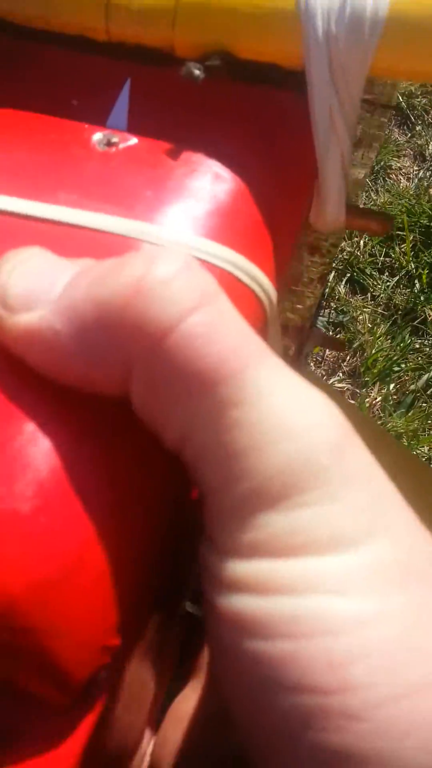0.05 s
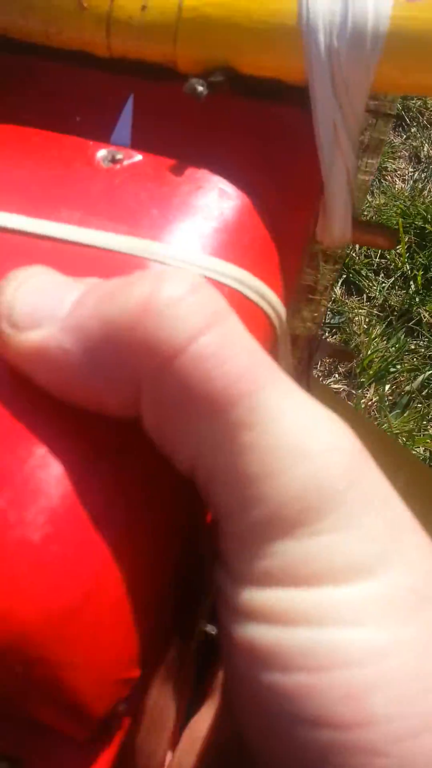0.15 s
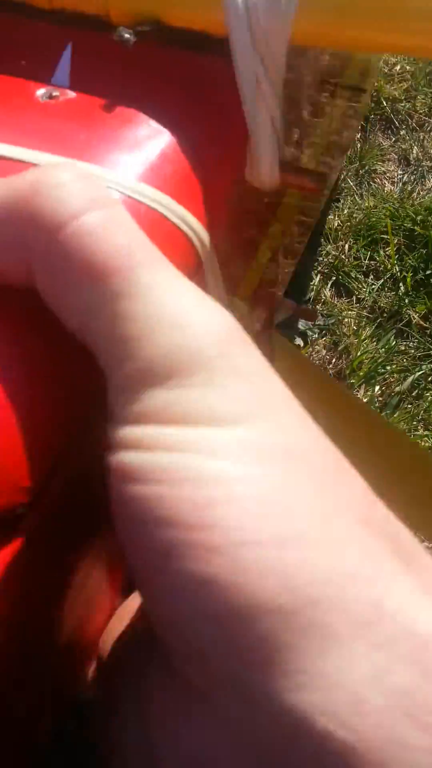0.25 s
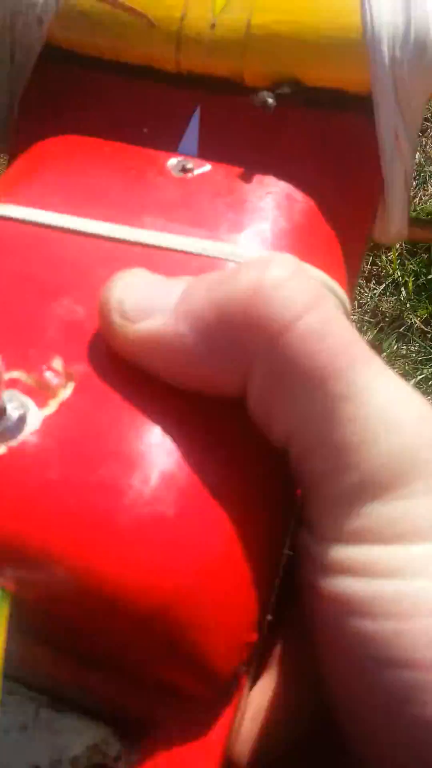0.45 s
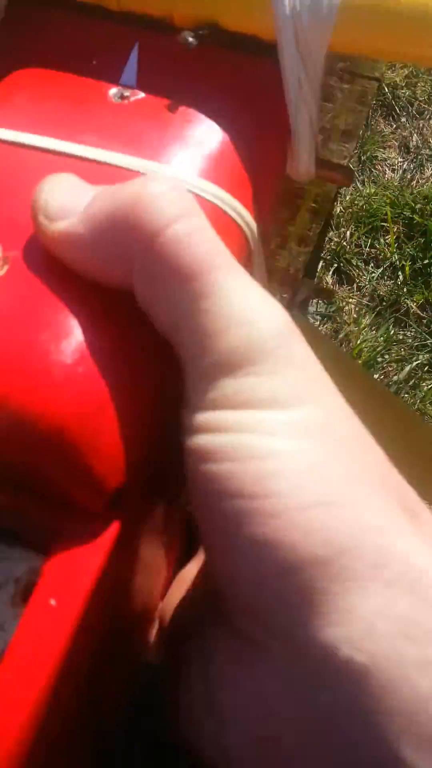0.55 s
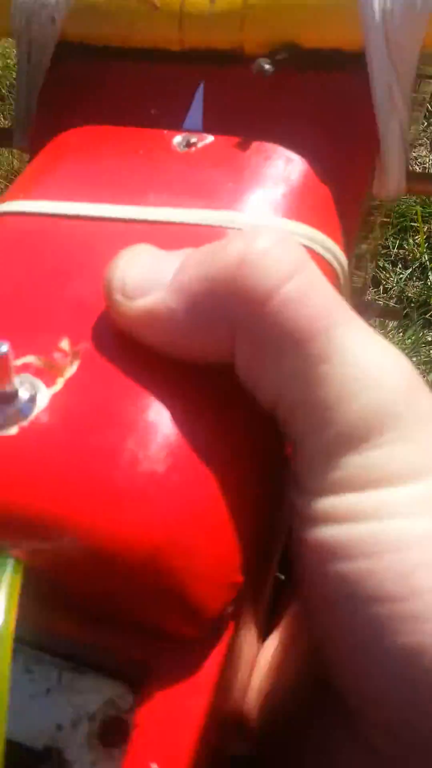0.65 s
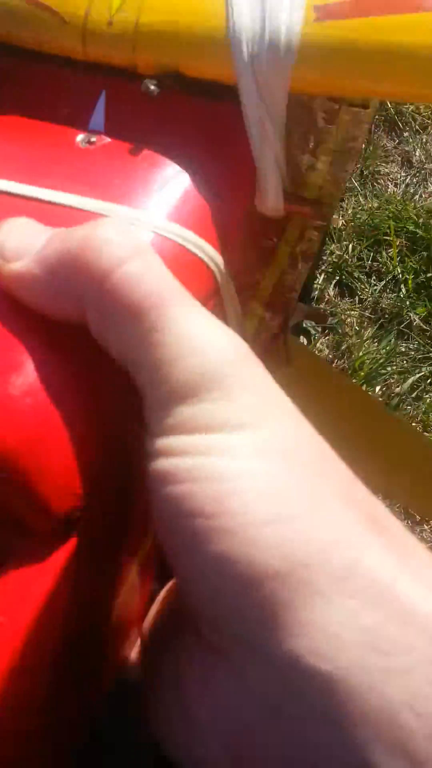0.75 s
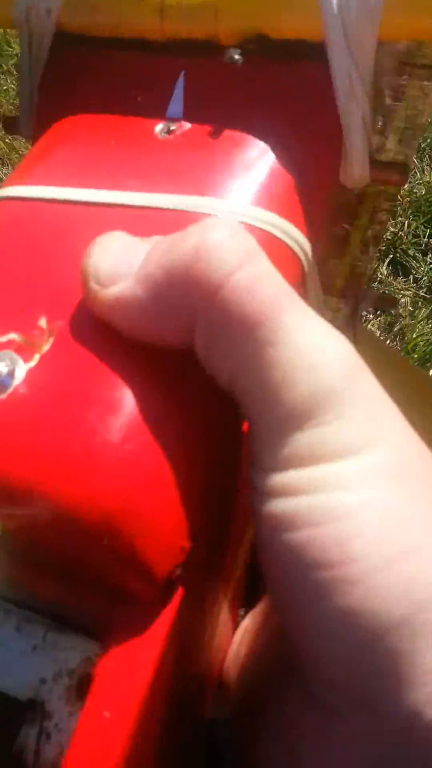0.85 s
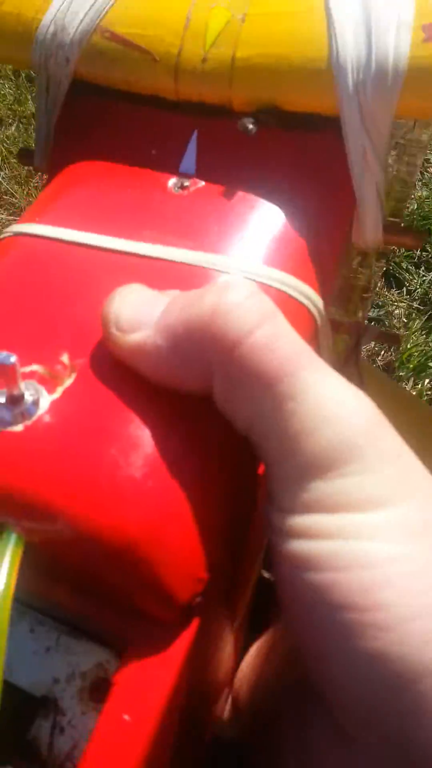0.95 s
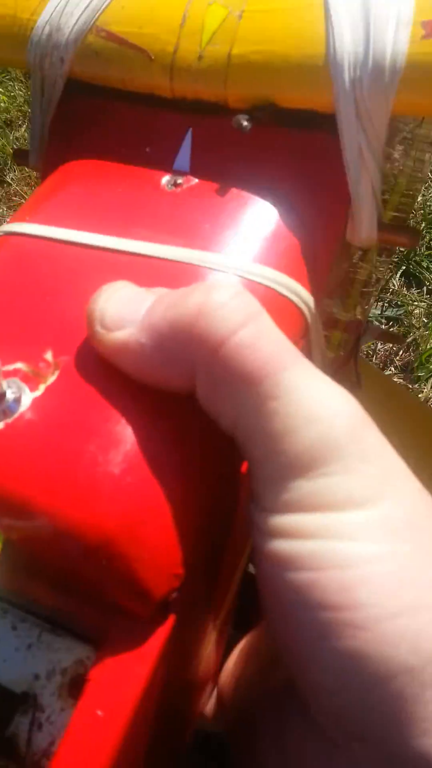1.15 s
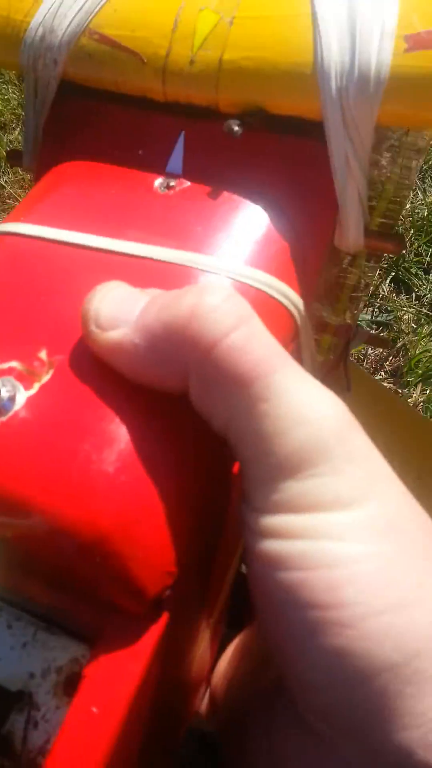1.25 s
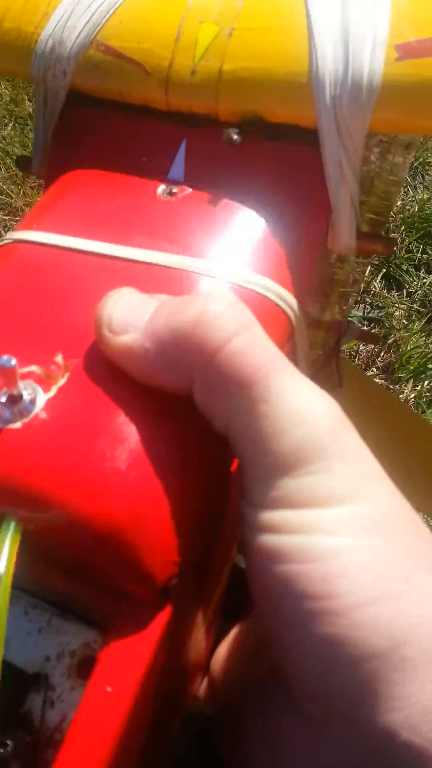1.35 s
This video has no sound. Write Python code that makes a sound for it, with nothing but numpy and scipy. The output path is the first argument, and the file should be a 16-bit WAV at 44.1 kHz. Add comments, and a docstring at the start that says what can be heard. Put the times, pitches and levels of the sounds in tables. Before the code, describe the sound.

Small plastic fuel tank shaken by hand, hollow knocks and scrapes with dull liquid thuds

```python
"""Shaken plastic fuel tank

A hand shakes a small plastic fuel tank in its seat in a plane, outdoors and close to the microphone.
Knocks and scrapes of shell on mount excite damped modes; skin rubs as grainy, coloured noise; the fuel
sloshes as low noise with dull thuds, short swelling tones. Air and hiss are coloured noise.
Nearly all of it reaches the left channel; the right one carries little but hiss."""
import sys
import numpy as np
from scipy import signal
from scipy.fft import rfft, irfft, next_fast_len
from scipy.io import wavfile
from scipy.ndimage import uniform_filter1d

SR = 44100
rng = np.random.default_rng(int(sys.argv[2]) if len(sys.argv) > 2 else 0)


def master_out(mix):
    """Clip the mix to full scale and print it as 16-bit PCM to the path in sys.argv[1]."""
    frames = np.transpose(np.atleast_2d(mix))
    ceiling = np.clip(frames, -1, 1)
    pcm = np.round(ceiling * 32767).astype(np.int16)
    wavfile.write(sys.argv[1], SR, pcm)


N = 61739  # samples

# Spectrum of the outdoor air. Each row: frequency in Hz, relative level in dB.
AIR_SPECTRUM = [(30, -6), (90, 24.5), (250, 0), (600, 6), (1200, -9), (2500, -36), (5000, -24),
                (14000, -19)]
# Rms level of the air in dB: left, right.
AIR_LEVELS_DB = [-61, -67]
# Hiss of changing level. Each row: time in seconds, level in dB.
HISS_LEVEL = [(0, -65.5), (.205, -63.5), (.225, -55), (.255, -55.5), (.29, -66), (.345, -55.5),
              (.41, -58.5), (.47, -54), (.62, -54.5), (.75, -52), (.93, -52.5), (1.0, -60.5), (1.07, -56),
              (1.11, -64), (1.315, -65.5), (1.345, -60.5), (1.4, -65.5)]
# Spectrum of the hiss. Each row: frequency in Hz, relative level in dB.
HISS_SPECTRUM = [(30, 2), (100, 8), (280, 17), (550, 8), (1000, 12), (2300, 7.5), (4000, 2.5), (6500, 0.5),
                 (11000, 0.5), (14500, -1)]
HISS_LEFT_DB = -0.5  # left channel against the right

# Low churning of the fuel. Each row: time in seconds, level in dB ahead of the bass cut.
SLOSH_LEVEL = [(0, -53.5), (.10, -53), (.12, -40), (.25, -45.5), (.29, -47.5), (.33, -37), (.40, -35.5),
               (.50, -39.5), (.60, -27.5), (.70, -35), (.84, -41.5), (.90, -44.5), (1.01, -50.5),
               (1.12, -41), (1.20, -43), (1.29, -52), (1.35, -46), (1.4, -53)]
# Spectrum of the churning. Each row: frequency in Hz, relative level in dB.
SLOSH_SPECTRUM = [(20, -33), (40, -25), (62, -0.5), (85, 3.5), (140, -4), (230, -6.5), (340, -10.5),
                  (700, -40.5), (1500, -33.5), (4000, -55)]
# Dull thuds of the fuel and of the tank in the hand, and, in the row at 0.518 s and 486 Hz, a low ring of the
# shell under the knock at 0.515 s. Each row: centre in seconds, pitch in Hz, peak of the fundamental in dB
# ahead of the bass cut, half length in seconds before scaling.
THUD_EVENTS = [(.133, 167, -33.5, 0.0063), (.149, 131, -28.5, 0.0065), (.219, 163, -29.5, 0.0063),
               (.241, 145, -26.5, 0.0016), (.318, 130, -28.5, 0.0025), (.351, 186, -25.5, 0.0044),
               (.393, 127, -19.5, 0.0038), (.403, 189, -22.5, 0.0026), (.421, 151, -26, 0.0022),
               (.437, 108, -35.5, .005), (.491, 162, -22.5, 0.0018), (.512, 140, -19.5, 0.0027),
               (0.518, 486, -17, 0.0023), (.557, 135, -24, 0.012), (.576, 295, -8, 0.0025),
               (0.586, 134, -21.5, 0.0038), (.626, 173, -18.5, .006), (.648, 96, -29.5, 0.009),
               (.678, 182, -29.5, 0.0088), (.713, 198, -21.5, 0.0035), (.788, 114, -31.5, 0.005),
               (.814, 214, -31, 0.0085), (.834, 228, -30.5, 0.0093), (.861, 146, -29.5, 0.0069),
               (.925, 240, -34.5, 0.0059), (1.109, 153, -34, 0.003), (1.127, 122, -34.5, 0.0068),
               (1.214, 179, -28.5, 0.0038), (1.262, 162, -35.5, 0.0029)]
THUD_ATTACK, THUD_RELEASE = .8, 1.1  # Gaussian widths, in half lengths
THUD_BULGE = 1.3  # the wall gives unevenly, so strong thuds gain an overtone
BASS_CUT_HZ = 32

# Rubbing of hand and shell. Each row: time in seconds, level in dB.
RUB_LEVEL = [(0, -67.5), (.20, -73), (.225, -44.5), (.255, -51.5), (.29, -66), (.34, -51.5), (.39, -49),
             (.42, -53), (.455, -41), (.54, -43), (.595, -41), (.66, -43.5), (.77, -42), (.93, -42),
             (.97, -58.5), (1.06, -46), (1.11, -65), (1.4, -75)]
# Spectrum of the rubbing. Each row: frequency in Hz, relative level in dB.
RUB_SPECTRUM = [(150, 7.5), (400, 8.5), (730, 7.5), (1050, -4), (1800, 2), (3000, -2.5), (4400, -1.5),
                (5900, 0), (7200, -9), (10000, -16), (14500, -25)]
RUB_GRAINS_PER_S, RUB_SMOOTH = 900, .6  # rate of slips; steady noise against grains of rms 1
RUB_PATCHY_DB, RUB_PATCH_S = 1, 0.01  # rms unevenness and its averaging time
RUB_RING_DB = -14.5  # ringing shell against the direct rub
# Dull creep of the grip. Each row: time in seconds, level in dB.
GRIP_LEVEL = [(0, -65), (.15, -61.5), (.29, -54.5), (.40, -66), (.62, -49.5), (.90, -62), (1.05, -50.5),
              (1.17, -50.5), (1.28, -58.5), (1.4, -72)]
# Spectrum of the creep. Each row: frequency in Hz, relative level in dB.
GRIP_SPECTRUM = [(150, 8), (350, -6.5), (650, 4), (1000, -5), (1700, -9.5), (3000, -21.5), (8000, -54)]

# Modes of the shell. Each row: frequency in Hz, decay by 60 dB in seconds, relative level in dB.
SHELL_MODES = [(513.5, 0.029, -5.5), (633, 0.027, -0.5), (744, 0.06, -0.5), (860, 0.0083, -10),
               (1194, 0.031, 21), (1320, 0.034, 1), (1733, 0.018, 20), (1836, 0.039, 6.5),
               (2570, 0.008, 6.5), (3300, 0.019, 7), (4257, 0.031, 2.5), (4834, 0.057, -2),
               (5130, 0.0061, 3.5), (5390, 0.047, -1)]
# Groups of modes from low to high. Each row: lowest frequency in Hz, highest frequency in Hz.
MODE_GROUPS_HZ = [(420, 880), (1020, 1400), (1580, 1980), (2300, 3800), (4000, 6200)]
# Contacts of shell and mount. Each row: start in seconds, rise in seconds, tuning of the modes as a
# factor, level of each of the five mode groups from low to high in dB, share sent to the right
# channel in dB ahead of its colouring.
CONTACTS = [(0.2325, 0.0014, 0.98, -40, -49, -39, -47, -49, -24),
            (0.3362, 0.0018, 1, -41, -53, -49, -60, -61, -24),
            (0.374, 0.0013, 1.04, -39, -48, -45, -44, -47, -24),
            (0.468, 0.0014, 1, -37, -41, -34, -33, -34, -20),
            (0.4775, 0.0015, 1, -31, -41, -38, -45, -45, -15),
            (0.5152, 0.0006, 1.02, -28, -37, -23, -37, -33, -23),
            (0.573, 0.0012, 0.95, -34, -48, -52, -49, -48, -24),
            (0.5895, 0.002, 1, -42, -54, -45, -49, -43, -24),
            (0.6245, 0.002, 1, -45, -63, -49, -49, -49, -24),
            (0.6375, 0.0012, 1, -41, -55, -46, -54, -62, -24),
            (0.665, 0.0006, 1, -47, -51, -46, -53, -50, -24),
            (0.6898, 0.0016, 1, -35, -39, -28, -30, -31, -22),
            (0.7325, 0.0012, 1, -38, -47, -49, -54, -48, -13),
            (0.7498, 0.0006, 0.99, -27, -28, -29, -36, -36, -17),
            (0.7845, 0.0006, 1, -40, -48, -50, -51, -50, -24),
            (0.8035, 0.0022, 1.03, -46, -55, -46, -49, -51, -24),
            (0.8312, 0.0013, 1.02, -36, -48, -42, -40, -37, -24),
            (0.872, 0.0007, 0.97, -40, -40, -36, -44, -45, -15),
            (0.905, 0.0012, 1, -36, -47, -44, -41, -45, -24),
            (0.912, 0.0014, 1, -35, -47, -39, -40, -41, -18),
            (0.9295, 0.0016, 1, -35, -47, -45, -48, -46, -24),
            (0.9795, 0.001, 1, -45, -64, -67, -69, -70, -24),
            (1.3255, 0.0004, 1, -62, -57, -63, -75, -66, -24)]
KNOCK_SPAN_S = .02  # knock levels are rms over this time
CHATTER_PER_S, FIRST_TOUCH = 6000, 1.3  # rate of tiny slips; force of the touch against a slip's peak
CRACK_DB, CRACK_T60_S = -8, .022  # dense, quickly damped modes under the distinct ones
TICK_DB, TICK_RISE_S = -13, 0.0004  # level against the top modes, for a contact of this rise
TICK_T60_S, TICK_CUT_HZ = 0.0078, 4100
# Filter of the knocks' trace on the right. Each row: frequency in Hz, gain in dB.
RIGHT_FILTER = [(60, -3), (400, -14), (800, -10), (1150, -23), (1500, -6), (1850, -5.5), (2300, -6),
                (5000, -51), (12000, -25)]

CUTOFF_HZ = 14550  # the recorder's upper limit


def amp(db):
    """Logarithmic level: decibels to amplitude gain."""
    return 10 ** (np.asarray(db) / 20)


def unit(x):
    """Normalisation of power: scales to rms 1."""
    return x / np.sqrt(np.mean(x ** 2) + 1e-20)


def level(points):
    """Envelope: decibels interpolated between (s, dB) points, as gain over time."""
    return amp(np.interp(np.arange(N) / SR, *np.transpose(points)))


def colour(x, points):
    """Linear filtering: weights the spectrum by (Hz, dB) points on a logarithmic frequency axis."""
    f, db = np.transpose(points)
    size = next_fast_len(len(x) + 2048)
    hz = np.fft.rfftfreq(size, 1 / SR)
    gain = amp(np.interp(np.log(hz + 1), np.log(f), db))
    return irfft(rfft(x, size) * gain, size)[:len(x)]


def noise(points):
    """Spectral shaping of white noise, scaled to rms 1."""
    return unit(colour(rng.standard_normal(N), points))


def add(mix, s, sound):
    """Superposition: mixes a sound in at a time in seconds."""
    part = mix[max(round(s * SR), 0):][:len(sound)]
    part += sound[:len(part)]


def background():
    """Stationary noise of quiet outdoor air, and modulated noise: a hiss that rises and falls."""
    air = np.array([amp(db) * noise(AIR_SPECTRUM) for db in AIR_LEVELS_DB])
    hiss = np.array([amp(HISS_LEFT_DB) * noise(HISS_SPECTRUM), noise(HISS_SPECTRUM)])
    return air + level(HISS_LEVEL) * hiss


def fuel():
    """Moving liquid: low-frequency noise, with brief tones as the weight shifts against a yielding wall, and
    one low ring of the shell under a knock."""
    out = level(SLOSH_LEVEL) * noise(SLOSH_SPECTRUM)
    for s, hz, db, half_s in THUD_EVENTS:
        t = np.arange(N) / SR - s
        width = half_s * np.where(t < 0, THUD_ATTACK, THUD_RELEASE)
        size = amp(db) * np.exp(-.5 * (t / width) ** 2)
        phase = 2 * np.pi * hz * t
        overtone = THUD_BULGE * size ** 2 * np.cos(2 * phase)  # grows as the square of the thud
        out += size * np.cos(phase) + overtone
    bass_cut = signal.butter(2, BASS_CUT_HZ, "highpass", fs=SR, output="sos")
    return signal.sosfilt(bass_cut, out)


def ring(force, lo_hz, hi_hz, tune=1):
    """Modal superposition: a force drives damped sines, each scaled to its own share of the energy."""
    t = np.arange(4096) / SR
    modes = []
    for hz, t60, db in SHELL_MODES:
        if lo_hz <= hz < hi_hz:
            impulse_response = amp(-60 * t / t60) * np.sin(2 * np.pi * hz * tune * t)
            response = signal.fftconvolve(force, impulse_response)[:len(force)]
            modes.append(amp(db) * unit(response))
    return unit(sum(modes))


def rub():
    """Sliding friction: fine, uneven slips of skin faintly ring the shell, over the grip's duller creep."""
    grains = unit(rng.standard_normal(N) * (rng.random(N) < RUB_GRAINS_PER_S / SR))
    patches = unit(uniform_filter1d(rng.standard_normal(N), max(round(RUB_PATCH_S * SR), 1)))
    force = (grains + RUB_SMOOTH * rng.standard_normal(N)) * amp(RUB_PATCHY_DB * patches)
    direct = unit(colour(force, RUB_SPECTRUM))
    slips = unit(direct + amp(RUB_RING_DB) * ring(force, 0, SR / 2))
    creep = unit(colour(force[::-1], GRIP_SPECTRUM))  # reversed, so its grains fall at other times
    return level(RUB_LEVEL) * slips + level(GRIP_LEVEL) * creep


def tick(rise_s, top_db):
    """Contact time and brightness: a brief treble burst, weaker for contacts that rise more slowly."""
    t = np.arange(round(KNOCK_SPAN_S * SR)) / SR
    burst = rng.standard_normal(len(t)) * amp(-60 * t / TICK_T60_S)
    band = signal.butter(1, [TICK_CUT_HZ, 2 * TICK_CUT_HZ], "bandpass", fs=SR, output="sos")
    burst = signal.sosfilt(band, burst)
    return amp(top_db + TICK_DB) * (TICK_RISE_S / rise_s) ** 2 * unit(burst)


def knock(rise_s, tune, group_db):
    """Modal excitation: a touch and tiny slips ring the shell; the contact's place weights the groups."""
    t = np.arange(4096) / SR
    u = t / max(rise_s, 1 / SR)
    slips = rng.choice([-1, 1], len(t)) * (rng.random(len(t)) < CHATTER_PER_S / SR)
    force = slips * u * np.exp(1 - u)  # envelope peaks at the rise time
    force[0] += FIRST_TOUCH
    dense_modes = rng.standard_normal(len(t)) * amp(-60 * t / CRACK_T60_S)
    crack = signal.fftconvolve(force, dense_modes)[:len(t)]
    out = np.zeros(len(t))
    for (lo, hi), db in zip(MODE_GROUPS_HZ, group_db):
        band = signal.butter(4 if lo > 3000 else 2, [lo, hi], "bandpass", fs=SR, output="sos")
        modes = unit(signal.sosfilt(band, ring(force, lo, hi * 1.1, tune)))
        band_crack = unit(signal.sosfilt(band, crack))
        out += amp(db) * unit(modes + amp(CRACK_DB) * band_crack)
    return out * np.sqrt(KNOCK_SPAN_S / t[-1])  # from rms over the whole block to rms over the span


def knocks():
    """Superposition of all contacts, with their thin, filtered trace in the right channel."""
    left, right = np.zeros((2, N))
    for s, rise_s, tune, *group_db, right_db in CONTACTS:
        sound = knock(rise_s, tune, group_db)
        add(left, s, sound)
        add(left, s + rise_s, tick(rise_s, group_db[-1]))
        add(right, s, amp(right_db) * sound)
    return np.array([left, colour(right, RIGHT_FILTER)])


def scene():
    """Superposition of sources: knocks and background on both sides, fuel and rubbing on the left only."""
    contacts = knocks()
    handling = np.array([fuel() + rub(), np.zeros(N)])
    return contacts + handling + background()


def record(dry):
    """Band limitation: the recorder's linear-phase low-pass."""
    taps = signal.firwin(511, CUTOFF_HZ, window=("kaiser", 8), fs=SR)
    return signal.oaconvolve(dry, taps[None], "same")


dry = scene()
out = record(dry)
master_out(out)
```